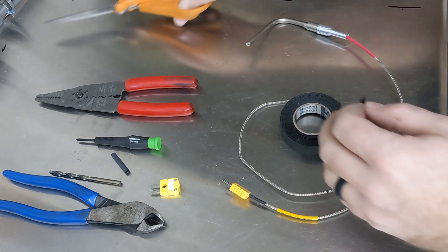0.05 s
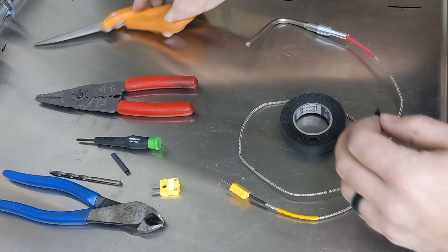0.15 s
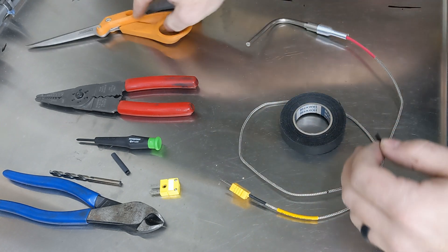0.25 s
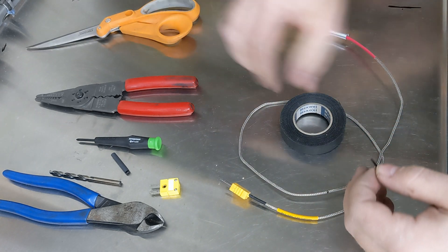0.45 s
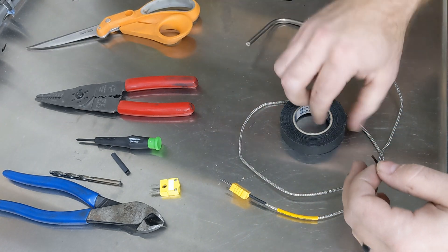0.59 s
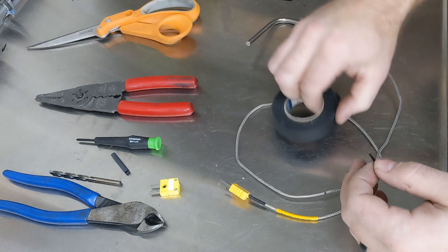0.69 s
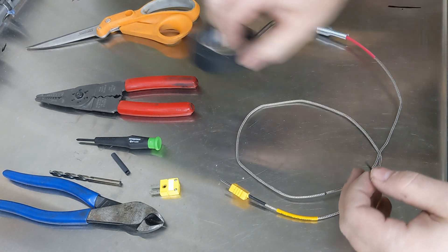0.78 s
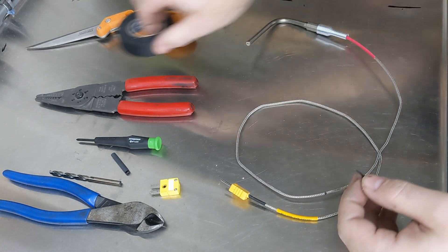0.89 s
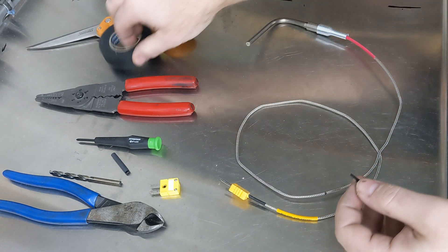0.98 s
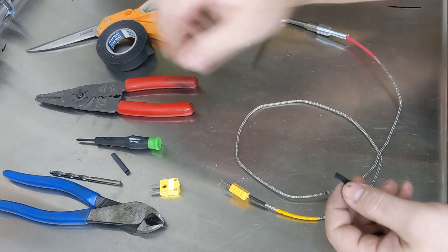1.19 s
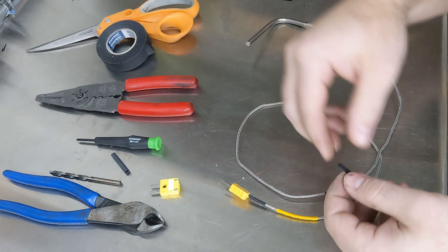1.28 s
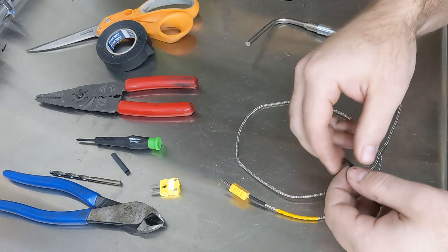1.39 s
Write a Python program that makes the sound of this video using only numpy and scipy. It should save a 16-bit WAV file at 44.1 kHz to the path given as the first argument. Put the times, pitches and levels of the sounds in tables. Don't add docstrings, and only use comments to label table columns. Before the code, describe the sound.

Scissors drop on a steel bench with a bright clack, slap flat, rock and settle; after a pause a tape roll thumps onto them. Close stereo microphones, hard-walled workshop, low steady hum.

```python
import sys
import numpy as np
from scipy import signal
from scipy.fft import rfft, irfft
from scipy.io import wavfile
from scipy.ndimage import uniform_filter1d

SR = 44100
rng = np.random.default_rng(int(sys.argv[2]) if len(sys.argv) > 2 else 0)


def attenuation_scalar(level_db):
    decades = np.asarray(level_db, float) / 20
    return 10 ** decades


def generate_wav(sig):
    pcm = np.round(np.clip(np.atleast_2d(sig).T, -1, 1) * 32767).astype(np.int16)
    wavfile.write(sys.argv[1], SR, pcm)


N = 63945
LEFT_LAG_S = .0002

# start in seconds, level in dB, ringing pitch in Hz, push in ms,
# share into the bench in dB.
TAPE = [(1.0483, -33.5, 550, 1, 4.5), (1.0630, -36, 1150, 0.42, 9.5), (1.0704, -26.5, 423, 0.65, 1),
        (1.07, -28.5, 1320, 0.17, -15.5), (1.0699, -27, 1700, 0.19, -8), (1.0707, -34, 1950, 0.088, -27),
        (1.0890, -29, 505, 0.78, 1.5), (1.1190, -34, 439, 0.53, -1.5), (1.1290, -36.5, 498, 0.85, 3),
        (1.1400, -38.5, 1390, 0.2, -22), (1.1640, -42, 940, 0.91, 3.5)]
# pitch in Hz, width in Hz, level in dB.
TIPS = [(4230, 460, 5), (4750, 1000, -6), (6220, 360, 1), (7350, 370, -1.5), (9000, 600, -9),
        (9800, 960, -6.5), (12800, 930, -1.5), (13400, 500, -8), (14400, 600, -7.5), (3400, 1300, -13)]


def band(x, hz, width):
    return signal.lfilter(*signal.iirpeak(min(hz, .45 * SR), hz / width, fs=SR), x)


def unit(x):
    return x / np.sqrt(np.mean(x ** 2))


def mode(x, hz, t60, turn=0):
    pole = np.exp(2j * np.pi * hz / SR - np.log(1000) / (t60 * SR))
    ringing = signal.lfilter([1], [1, -pole], x)
    return (ringing * np.exp(1j * turn)).imag


def pair():
    shared, left, right = rng.standard_normal((3, N))
    low = signal.butter(1, 480, fs=SR)
    treble = np.array([v - signal.lfilter(*low, v) for v in (left, right)])
    return signal.lfilter(*low, shared) + treble


def walk(rate):
    k = int(SR / rate)
    w = uniform_filter1d(uniform_filter1d(rng.standard_normal(N), k), k)
    return (w - w.mean()) / w.std()


def shop():
    # frequency in Hz, density in dB per Hz.
    air_spectrum = [(15, -39), (25, -28), (49, 3), (123, -2.5), (405, -18), (476, -17), (2840, -28.5),
                    (14800, -59), (16000, -45)]
    # centre in Hz, width in Hz, level in dB.
    hum_bands = [(67.7, 17, -59.5), (88.54, 7.5, -58), (117.2, 1.7, -58), (142.4, 12, -65),
                 (231, 8.23, -68), (435, 36, -99), (7100, 3000, -74), (14420, 10000, -74)]
    f = np.fft.rfftfreq(N, 1 / SR)
    hz, db = np.array(air_spectrum).T
    air = irfft(rfft(pair()) * attenuation_scalar(np.interp(np.log(f + 1), np.log(hz), db)), N)
    hum = 0
    for centre, width, level_db in hum_bands:
        narrow = band(band(pair(), centre, width), centre, width)
        hum = hum + attenuation_scalar(level_db + 0.65 * walk(13.0)) * unit(narrow)
    return attenuation_scalar(-52.5 + 0.27 * walk(1.35)) * unit(air) + hum


def brush():
    # swell centre in seconds, length in seconds, level in dB, centre in Hz.
    strokes = [
        (0, .03, -44, 75),
        (.058, .05, -67, 14500),
        (.06, .05, -71, 7500),
        (.686, .04, -69, 6000),
        (.686, .04, -69, 13000),
        (.04, .12, -68, 2000),
    ]
    t = np.arange(N) / SR
    out = 0
    for s, length_s, db, hz in strokes:
        swell = np.exp(-(2 * (t - s) / length_s) ** 2)
        out = out + attenuation_scalar(db) * swell * unit(band(pair(), hz, hz * .6))
    return out


def steel(rows, peaks):
    ring_cycles, scatter_db = 1.7, 1.5
    crack_db, crack_t60_s, steel_db = -7, .018, -2.5
    size = 2048
    out, t = np.zeros((2, N)), np.arange(size) / SR
    for s, db, tilt_db, ms in rows:
        chance = rng.standard_normal((len(peaks), 3))
        noise = rng.standard_normal((3, size))
        hit = noise[2] ** 3 * np.exp(-t / (max(ms, .05) / 1000)) / np.sqrt(1 + ms * 40)
        hit[0] += 2
        ring = 0
        for (hz, width, mode_db), c in zip(peaks, chance):
            left = np.pi / 2 + 2 * np.pi * hz * LEFT_LAG_S + .5 * c[2]
            turn = np.array([[left], [0]]) + np.pi * (c[2] > 0)
            both = mode(hit, hz, ring_cycles / width, turn)
            gain = attenuation_scalar(mode_db + tilt_db * np.log2(hz / 5000) + scatter_db * c[:2, None])
            ring = ring + gain * both / np.abs(both).max()
        crack = band(noise[:2], 6000 * attenuation_scalar(tilt_db), 9300) * attenuation_scalar(-60 * t / (crack_t60_s + ms / 200))
        contact = ring / np.abs(ring).max() + attenuation_scalar(crack_db) * crack / np.abs(crack).max()
        i = int(s * SR)
        out[:, i:i + size] += attenuation_scalar(db + steel_db) * contact
    return signal.sosfilt(signal.butter(2, 1600, "high", fs=SR, output="sos"), out)


def points_strike():
    # start in seconds, peak in dB, tilt in dB per octave, chatter in ms.
    contacts = [
        (.2046, -4.5, 0.5, .9),
    ]
    # pitch in Hz, width in Hz, level in dB.
    points = [(2054, 95, -11.5), (2670, 140, -6), (5030, 280, -27.5), (4250, 180, 0.5), (5760, 310, -12),
              (7250, 450, -2.5), (9200, 690, -8.5), (11360, 610, -7.5), (13260, 1000, -5), (15100, 630, -7)]
    return steel(contacts, points)


def knocks():
    # start in seconds, level in dB, ringing pitch in Hz, push in ms,
    # share into the bench in dB.
    handles = [(.2047, -28.5, 617, 0.63, 3), (.2052, -32, 1210, 0.12, -14), (.2210, -26.5, 611, 0.86, -1.5),
               (.2305, -26.5, 890, 0.19, 2), (.2320, -30, 1403, 0.34, 7), (.2470, -26, 603, 0.57, 2),
               (.2665, -24.5, 613, 0.97, -1), (.2820, -28.5, 558, 0.82, 2), (.3500, -28, 598, 0.59, -1),
               (.3555, -28.5, 605, 1, -5), (.3570, -29, 478, 0.37, -8), (.3770, -32, 480, 0.66, 5.5),
               (.3900, -29.5, 585, 0.54, -0.5), (.4010, -35.5, 405, 0.57, 2), (.4110, -32, 638, 1, -3),
               (.4270, -38.5, 520, 0.96, 6.5), (.4550, -39, 440, 0.52, -3.5), (.4740, -52, 476, 0.98, 15)]
    # pitch in Hz, level in dB, t60 in seconds.
    bench = [(67.8, -15.5, 0.22), (122.6, -12.5, 0.21), (299.5, -31.5, 0.12), (412, -15.5, 0.1),
             (469, -15.5, .14), (535.6, -14.5, 0.17), (605.5, -6, 0.11), (743.5, -15.5, 0.18),
             (857, -22, 0.22), (1022, -10.5, 0.2), (1507, -33, 0.13), (1700, -22, 0.1), (2680, -27, .25)]
    handle_t60_s = .034
    sheet_db, sheet_t60_s, sheet_hz, sheet_width_hz = 5.5, .077, 1430, 2700
    size = 4096
    drive, out = np.zeros((len(bench), 2, N)), np.zeros((2, N))
    t = np.arange(size) / SR
    for s, db, hz, ms, bench_db in list(handles) + list(TAPE):
        i, n = int(s * SR), max(int(ms * SR / 1000), 2)
        push = np.sin(np.pi * (np.arange(n) + .5) / n) * np.pi / 2 / n
        chance = rng.standard_normal((len(bench), 4))
        noise = rng.standard_normal((3, size))
        scatter_db = 1.07 * chance[:, :1] + 1.1 * chance[:, 1:3]
        gain = np.sign(chance[:, 3:]) * attenuation_scalar(db + bench_db + scatter_db)
        drive[:, :, i:i + n] += gain[:, :, None] * push
        turn = np.array([[0.61 * 2 * np.pi * hz * LEFT_LAG_S], [0]])
        handle = mode(np.pad(push, (0, size - n)), hz * 0.955, handle_t60_s)
        handle = mode(handle, hz * 1.072, handle_t60_s, turn)
        sheet = band(noise[0] + 1.14 * noise[1:], sheet_hz, sheet_width_hz) * attenuation_scalar(-60 * t / sheet_t60_s)
        sheet = signal.lfilter(push[::2] * 2, 1, sheet)
        out[:, i:i + size] += attenuation_scalar(db) * (handle / np.abs(handle).max() + attenuation_scalar(sheet_db + bench_db) * sheet)
    for d, (hz, db, t60) in zip(drive, bench):
        split = .022 * (hz > 700)
        for k in (-1, .3, 1):
            out = out + attenuation_scalar(db) * mode(d, hz * (1 + k * split), t60) / 3
    return out


def boom():
    # start in seconds, level in dB.
    booms = [
        (0.214, -38),
        (0.299, -37.5),
        (.380, -33.5),
        (0.428, -35),
        (1.071, -31.5),
        (1.128, -33),
        (1.202, -46.5),
    ]
    boom_hz, fade_t60_s, rise_t60_s = 203, .13, .043
    drive = np.zeros(N)
    for s, db in booms:
        drive[int(s * SR)] = attenuation_scalar(db)
    return mode(mode(drive, boom_hz, fade_t60_s), boom_hz, rise_t60_s) * attenuation_scalar(-38.5)


def landing():
    # start in seconds, peak in dB, tilt in dB per octave, chatter in ms.
    contacts = [
        (.2210, -9.5, 1.5, 1.5),
        (.2288, -19, -0.5, 1.5),
        (.2445, -14.5, 0.5, 2.1),
        (.2495, -22, 1, 2),
        (.2615, -29, 1, 1.3),
        (.2840, -48, -2, 1.5),
    ]
    # pitch in Hz, width in Hz, level in dB.
    blades = [(1850, 350, -6.5), (2720, 260, -5), (3476, 260, -3.5), (4200, 580, 0), (5900, 350, -2),
              (7180, 400, -1.5), (8530, 600, -4.5), (10280, 800, -5), (12200, 460, -4), (13990, 800, -5.5)]
    return steel(contacts, blades)


def slap():
    # start in seconds, peak in dB, tilt in dB per octave, chatter in ms.
    contacts = [
        (.2310, -2.5, 0, 1.5),
        (.2325, -10.5, -5.5, 0.89),
    ]
    # pitch in Hz, width in Hz, level in dB.
    flat = [(1930, 75, -9.5), (2640, 160, -1), (3640, 160, -3.5), (4266, 250, -2.5), (5720, 250, -3.5),
            (7000, 350, -2.5), (9010, 400, -13.5), (11430, 450, -10.5), (12700, 500, -11),
            (14500, 990, -11)]
    return steel(contacts, flat)


def rocking():
    # start in seconds, peak in dB, tilt in dB per octave, chatter in ms.
    contacts = [
        (.3770, -15, 2.5, 3.2),
        (.4005, -21, -3, 1.7),
        (.4050, -19, 0.5, 2),
        (.4262, -29, -2, 2),
        (.4315, -29, -0.5, 2.4),
        (.4550, -35.5, -7, 1.1),
        (.4650, -40, -6, 1.1),
        (.4740, -38, -7, 1.5),
    ]
    return steel(contacts, TIPS)


def roll():
    # pitch in Hz, level in dB, t60 in seconds.
    thin_rings = [(969, -19, 0.29), (1247, -26.5, 0.33), (1320, -19, 0.57), (1413, -25.5, 0.47),
                  (1965, -23, 0.32), (2265, -27.5, 0.17), (2570, -29.5, 0.46), (2652, -29.5, 0.37)]
    drive = np.zeros(N)
    for s, db, *_ in TAPE:
        drive[int(s * SR)] += attenuation_scalar(db)
    out = 0
    for hz, db, t60 in thin_rings:
        turn = np.array([[2 * np.pi * hz * LEFT_LAG_S], [0]])
        out = out + attenuation_scalar(db) * mode(drive, hz, t60, turn)
    return out


def nudged():
    # start in seconds, peak in dB, tilt in dB per octave, chatter in ms.
    contacts = [(1.0578, -29, 2.5, 4.2), (1.0632, -25, -1.5, 1.2), (1.0705, -32, -2, 1.3),
                (1.0820, -33, 4, 2.3), (1.0880, -20, -9, 1.3), (1.0930, -26.5, -6, 2),
                (1.1020, -42, -15, 1.2), (1.1186, -26, -11, 2.1), (1.1310, -36.5, -2, 2.5),
                (1.1920, -44.5, 3, 2)]
    return steel(contacts, TIPS)


def room(x):
    # band centre in Hz, level in dB, t60 in seconds.
    tail_bands = [(166, -18.5, 0.39), (403.6, -23, 0.61), (1150, -22, 0.97), (2398, -18, 0.83),
                  (5890, -10.5, 0.28), (13020, -8, .35)]
    t = np.arange(N) / SR
    tail = 0
    for hz, db, t60 in tail_bands:
        tail = tail + attenuation_scalar(db - 60 * t / t60) * unit(band(band(pair(), hz, hz), hz, hz))
    tail = tail * np.clip((t - .002) / 0.0023, 0, 1) * attenuation_scalar(-35.5)
    return signal.fftconvolve(tail, x[None])[:, :N]


def scene():
    # centre in Hz, width in Hz, lift in dB.
    left_lift = [(1300, 900, 0.5), (4330, 3700, 1.5), (400, 504, 1.5)]
    near = points_strike() + knocks() + boom() + landing() + slap() + rocking() + roll() + nudged()
    left = near[0]
    for hz, width, db in left_lift:
        left = left + (attenuation_scalar(db) - 1) * band(near[0], hz, width)
    left = np.roll(left, int(round(LEFT_LAG_S * SR)))
    right = near[1] + (attenuation_scalar(5) - 1) * band(near[1], 14000, 6800)
    ears = np.array([left, right])
    return (ears + room(near.mean(axis=0)) + brush() + shop()) * attenuation_scalar([[-.6], [.6]])


def top_cut(x):
    return signal.sosfilt(signal.butter(12, 16830, fs=SR, output="sos"), x)


def record(dry):
    dipped = dry - .55 * band(dry, 11000, 900)
    topped = signal.sosfilt(signal.ellip(8, .3, 40, 15750, fs=SR, output="sos"), dipped)
    mix = signal.sosfilt(signal.butter(4, 46, "high", fs=SR, output="sos"), topped)
    return top_cut(mix)


dry = scene()
out = record(dry)
generate_wav(out)
```